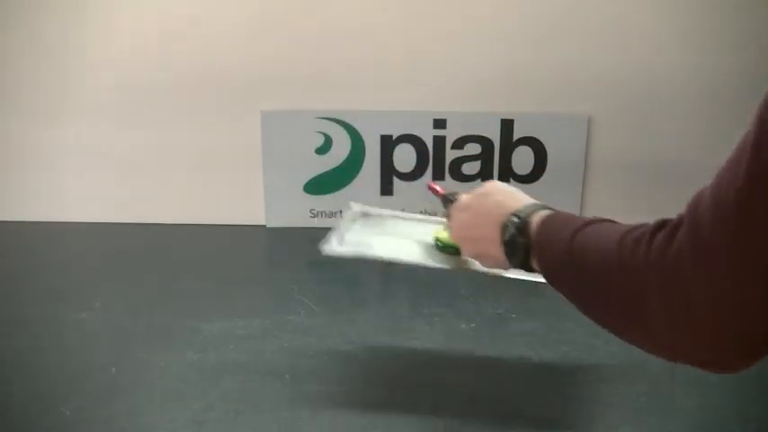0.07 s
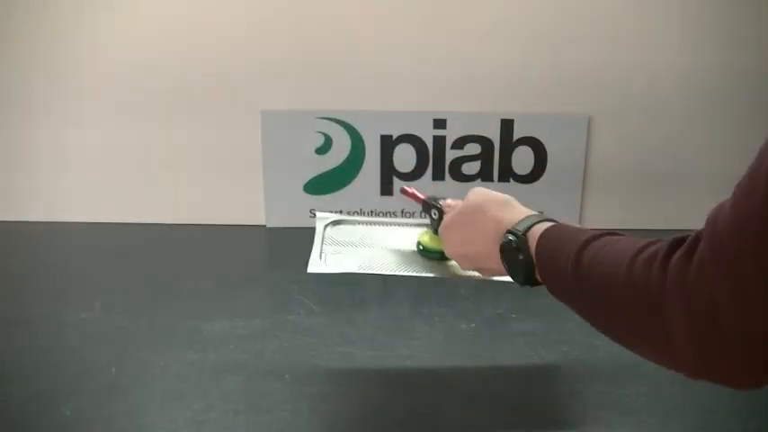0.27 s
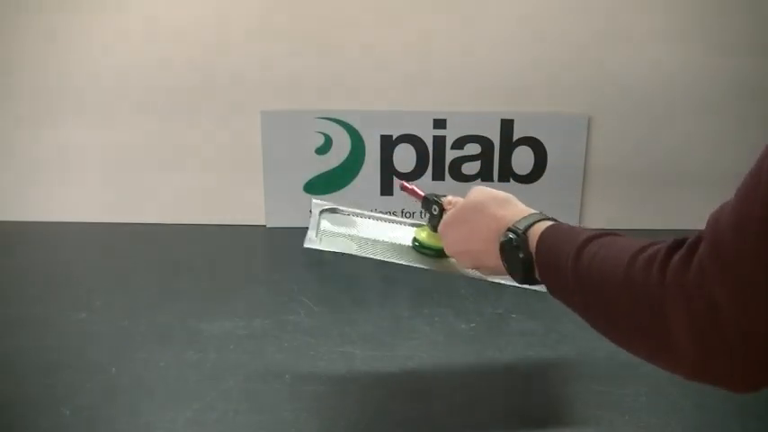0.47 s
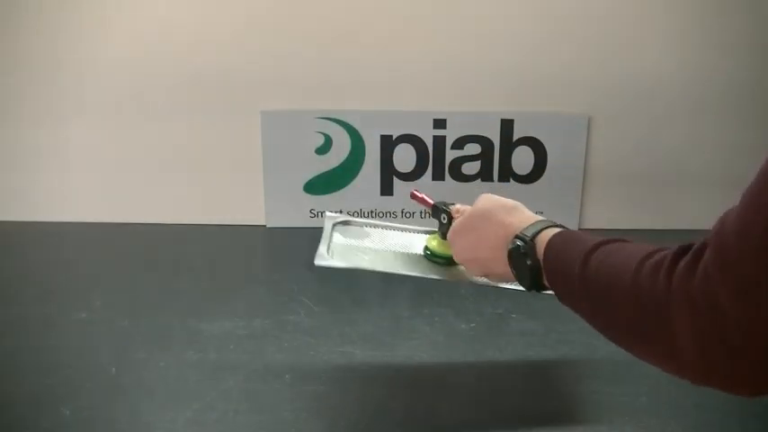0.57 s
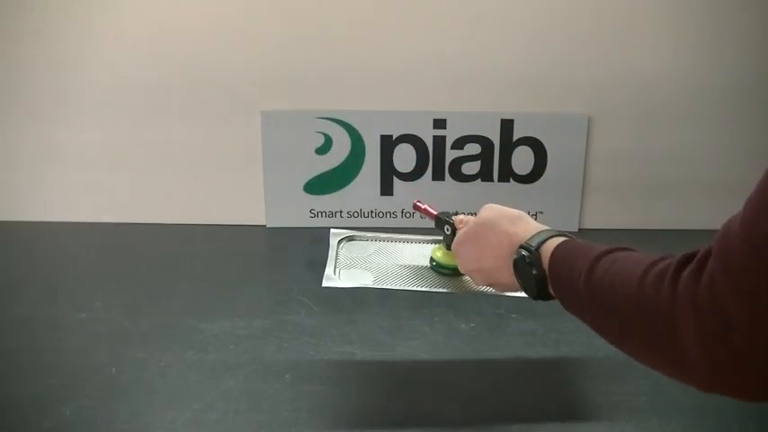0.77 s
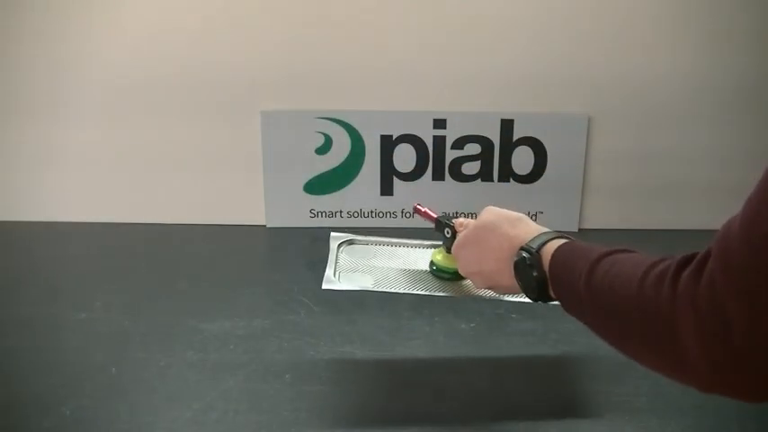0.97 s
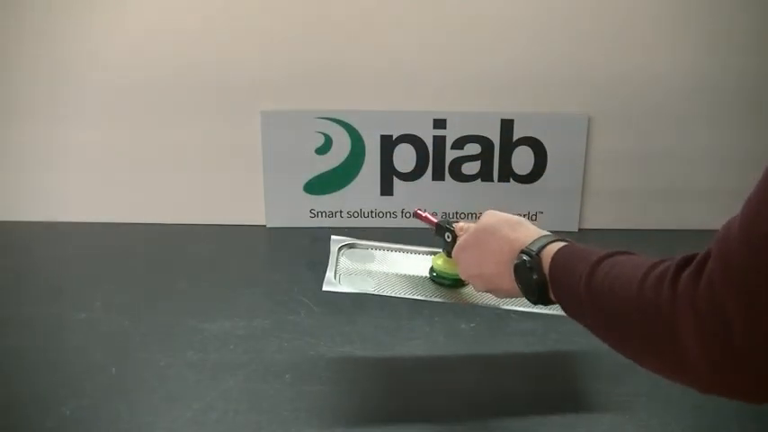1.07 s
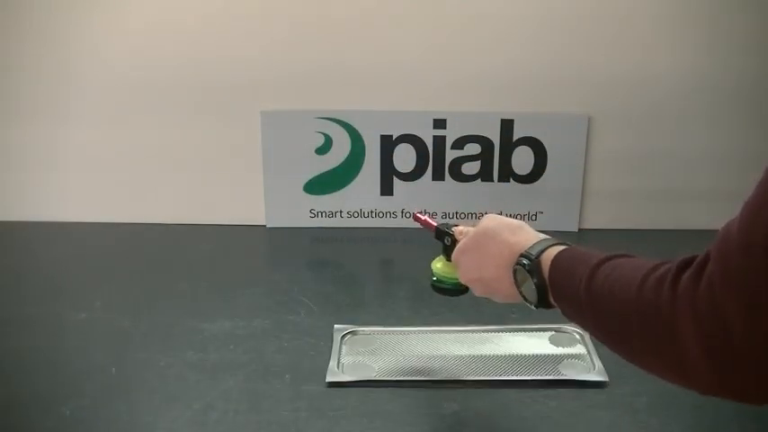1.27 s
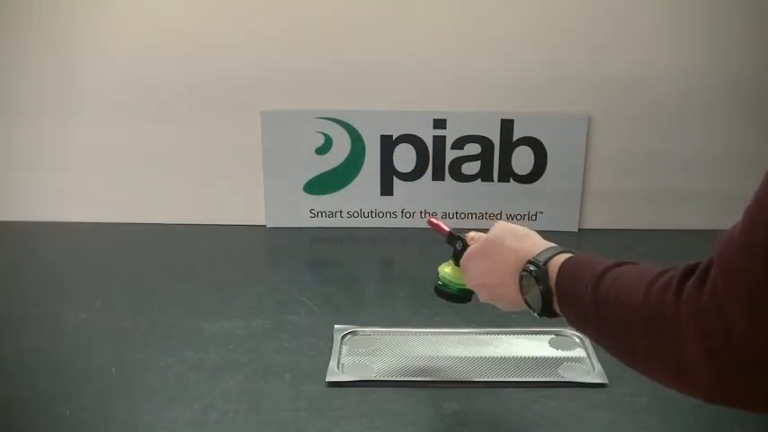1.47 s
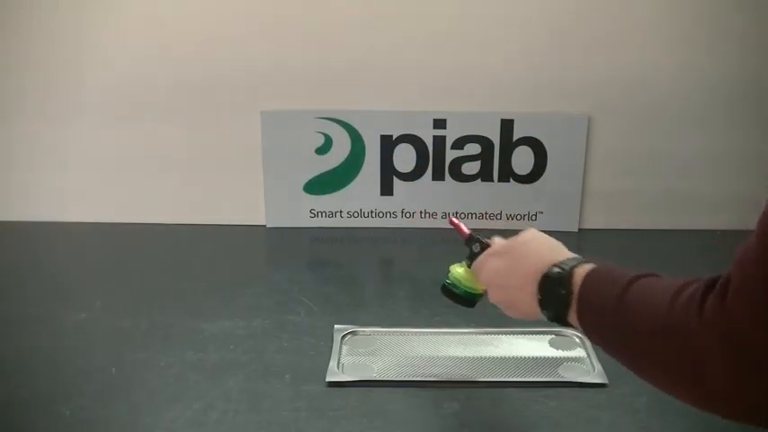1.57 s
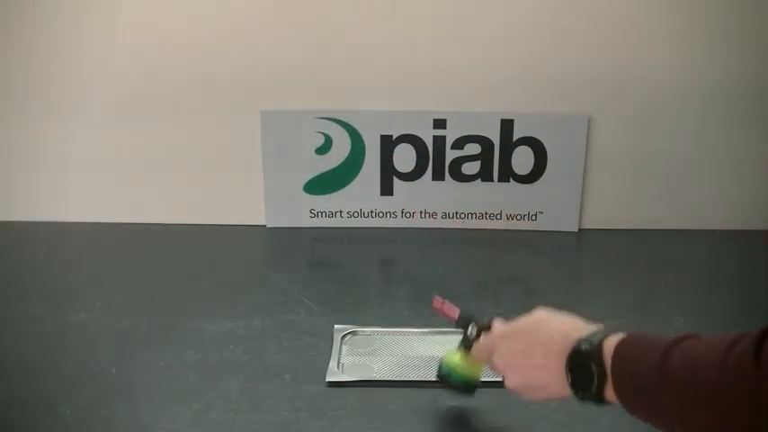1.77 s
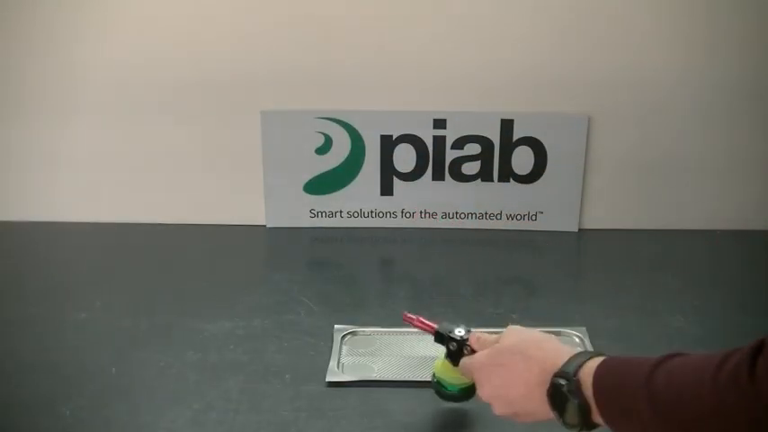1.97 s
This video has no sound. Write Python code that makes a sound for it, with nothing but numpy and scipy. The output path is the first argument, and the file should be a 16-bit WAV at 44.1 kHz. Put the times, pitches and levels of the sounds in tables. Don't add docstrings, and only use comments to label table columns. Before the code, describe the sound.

A thin metal sheet drops flat on a hard table with a loud, bright, clattering crash. Before it, a whistling compressed-air hiss snaps off with a valve click, then near quiet. Close stereo pickup in a lively room.

```python
import sys
import numpy as np
from scipy import signal
from scipy.fft import rfft, irfft, next_fast_len
from scipy.io import wavfile
from scipy.ndimage import uniform_filter1d, map_coordinates

SR = 44100
rng = np.random.default_rng(int(sys.argv[2]) if len(sys.argv) > 2 else 0)


def wrap_up_sound(samples):
    columns = np.atleast_2d(samples).T
    tamed = np.clip(columns, -1, 1)
    steps = np.round(tamed * 32767).astype(np.int16)
    wavfile.write(sys.argv[1], SR, steps)


def elevation(decibels):
    levels = np.asarray(decibels, float)
    return 10 ** (levels / 20)


N = 89567
LEAD = SR // 2
LEFT_DB = 1.2

# (time [s], level [dB])
CONTACTS = [
    (1.2609, 18),
    (1.263, 16),
    (1.266, 18),
    (1.2769, 4),
    (1.283, 5),
    (1.2873, 18),
    (1.2928, 16),
    (1.311, 10),
    (1.3649, 5),
]


def unit(x):
    return x / np.sqrt(np.mean(x ** 2) + 1e-20)


def along(points, hz):
    f, v = np.transpose(points)
    return np.interp(np.log(hz + 1), np.log(f + 1), v)


def filtered(x, response):
    n = x.shape[-1]
    m = next_fast_len(n + SR // 4)
    return irfft(rfft(x, m) * response(np.fft.rfftfreq(m, 1 / SR)), m)[..., :n]


def resonances(table):
    def response(f):
        total = 0
        for k, (centre_hz, width_hz, db) in enumerate(table):
            damping = 1j * f * width_hz
            total = total + (-1) ** k * elevation(db) * damping / (centre_hz * centre_hz - f * f + damping)
        return total
    return response


def noise(spectrum):
    return unit(filtered(rng.standard_normal(LEAD + N), lambda hz: elevation(along(spectrum, hz))))


def pair(x, alike):
    def mid_side(hz):
        turn = np.arccos(np.clip(along(alike, hz), -1, 1)) / 2
        return np.array([np.cos(turn), np.sin(turn)])
    mid, side = filtered(x, mid_side)
    return np.array([mid + side, mid - side])


def dying(t60s, channels):
    hz, t, z = signal.stft(rng.standard_normal((channels, SR)), SR, nperseg=256)
    t60 = np.maximum(along(t60s, hz), .01)[:, None]
    return signal.istft(z * elevation(-60 * t / t60), SR, nperseg=256)[1]


def clock():
    return (np.arange(LEAD + N) - LEAD) / SR


def puff(start_s, rise_s, hold_s, t60_s):
    t = clock() - start_s
    return np.clip(t / rise_s, 0, 1) * elevation(-60 * np.maximum(t - rise_s - hold_s, 0) / t60_s)


def ring(modes, t, longest_s):
    out = 0
    for hz, db, t60_s in modes:
        level_db = db + rng.normal(0, 2.2) - 60 * t / min(t60_s, longest_s)
        out = out + elevation(level_db) * np.sin(2 * np.pi * hz * t)
    return out


def shimmer(groups, t):
    out = 0
    for hz, width_hz, db, t60_s in groups:
        band = resonances([(hz, width_hz, 0)])
        beating = unit(filtered(rng.standard_normal(len(t)), lambda f: band(f) ** 2))
        out = out + elevation(db - 60 * t / t60_s) * beating
    return out


def patchy(x, db):
    z = signal.stft(x, nperseg=512)[2]
    field = uniform_filter1d(rng.standard_normal(z.shape), size=7, axis=0)
    field = uniform_filter1d(field, size=16, axis=1)
    return unit(signal.istft(z * elevation(db * unit(field)), nperseg=512)[1][:len(x)])


def add(out, s, x):
    part = out[LEAD + round(s * SR):][:len(x)]
    part += x[:len(part)]


def room_tone():
    # (frequency [Hz], density [dB per Hz])
    air_spectrum = [(15, -29), (30, 3), (55, 1), (100, -4.5), (250, -4.5), (1190, -16), (3080, -17.5),
                    (16000, -30.5)]
    # (frequency [Hz], correlation)
    air_alike = [(40, 0.95), (100, 0.54), (380, 0.21), (2380, 0.27), (15000, 0.13)]
    return elevation(-54.5) * pair(np.array([noise(air_spectrum), noise(air_spectrum)]), air_alike)


def jet():
    # (time [s], whistle level [dB], hiss level [dB])
    flow = [(0.0, -24, -17), (0.044, -19.5, -17.5), (0.124, -19.5, -19.5), (0.3, -19.5, -18.5),
            (0.4, -19.5, -19.5), (0.463, -20, -17.5), (0.47, -15.5, -23), (0.475, -25, -24),
            (0.49, -23, -22), (0.497, -15.5, -20), (0.503, -22, -21)]
    # (frequency [Hz], width [Hz], level [dB])
    nozzle = [(2970, 500, -24.5), (5620, 540, -14.5), (5955, 250, -6.5), (6260, 283, -3.5),
              (6760, 634, -12), (10790, 450, -21.5), (11600, 600, -19.5)]
    # (frequency [Hz], density [dB per Hz])
    hiss_spectrum = [(200, -23), (1100, -15.5), (1800, -2), (4500, 1), (8000, 3), (9700, -0.5), (13400, -3),
                     (15500, -0.5)]
    # (time [s], pitch ratio)
    pitch = [(0, .978), (.13, 1.001), (.28, .997), (.42, 1.006), (.5, .985)]
    flutter_db, flutter_hz = 1, 244
    shut_s, shut_fall_s = .503, 0.0035
    t = clock()

    flutter_at = np.arange(LEAD + N) * flutter_hz / SR
    flutter = map_coordinates(rng.standard_normal(2000), [flutter_at], mode="mirror")
    turbulence = elevation(flutter_db * flutter) * rng.standard_normal(LEAD + N)
    whistle = unit(filtered(turbulence, resonances(nozzle)))
    read_at = np.cumsum(np.interp(t, *np.transpose(pitch)))
    whistle = unit(map_coordinates(whistle, [read_at], mode="mirror"))

    s, whistle_db, hiss_db = np.transpose(flow)
    whistle = elevation(np.interp(t, s, whistle_db)) * whistle
    hiss = elevation(-7 + np.interp(t, s, hiss_db)) * patchy(noise(hiss_spectrum), db=3)
    return (whistle + hiss) * np.clip((shut_s - t) / shut_fall_s + 1, 0, 1)


def ports(x, lean, lead):
    def half(hz):
        return elevation(along(lean, hz) / 2 - LEFT_DB) * np.exp(.5j * along(lead, hz))
    return filtered(x[None], lambda hz: np.array([half(hz), 1 / half(hz)]))


def unrelated(x):
    # (frequency [Hz], level [dB])
    spread = [(1000, -30), (4000, -21.5), (7000, -10.5), (10000, -6.5), (15000, -11)]
    return filtered(x, lambda hz: elevation(along(spread, hz))) * [[1], [-1]]


def room(x):
    # (frequency [Hz], t60 [s])
    room_t60 = [(150, 0.84), (500, 0.9), (1500, 1.07), (3000, 0.86), (6000, 0.53), (12000, 0.32)]
    # (frequency [Hz], correlation)
    room_alike = [(60, 0.59), (240, 0.9), (950, 0.93), (3770, 0.63), (15000, 0.043)]
    gap_s = .006
    tail = pair(dying(room_t60, channels=2), room_alike)
    late = np.pad(x, (round(gap_s * SR), 0))[None]
    return signal.fftconvolve(late, tail / np.linalg.norm(tail[0]), axes=1)[:, :LEAD + N]


def valve():
    # (time [s], level [dB])
    snaps = [
        (.5108, -8.5),
        (0.5125, -9.5),
        (0.515, -8.5),
        (0.517, -12),
    ]
    # (frequency [Hz], level [dB], t60 [s])
    valve_modes = [(303, -2, .03), (710, -13, .03), (2070, -11, .03), (3090, -13.5, 0.096),
                   (4643, -5.5, 0.036), (4930, -9, .03), (5630, -9, .02), (6100, -9, 0.04),
                   (7000, -1, 0.0088), (7500, -2, 0.023), (9560, -5.5, 0.072), (9930, -14.5, 0.25),
                   (12680, -13, .03)]
    # (frequency [Hz], width [Hz], level [dB], t60 [s])
    held = [(3040, 140, -39.5, 1), (4560, 130, -43, .95), (6230, 120, -37, .7)]
    # (frequency [Hz], width [Hz], level [dB])
    housing = [(1520, 2400, -11), (5300, 2050, 3), (6900, 2700, -0.5), (12500, 4200, 1)]
    # (frequency [Hz], density [dB per Hz])
    vent_spectrum = [(180, -48), (300, -27.5), (624, -33), (725, -20), (1210, -22.5), (1480, -18),
                     (7080, -6.5), (16000, -22.5)]

    out, t = np.zeros(LEAD + N), np.arange(SR // 20) / SR
    for s, db in snaps:
        tone = 0.97 * ring(valve_modes, t, longest_s=.016)
        click = 0.78 * elevation(-60 * t / 0.02) * rng.standard_normal(len(t))
        add(out, s, elevation(db) * (tone + click))
    add(out, snaps[0][0], shimmer(held, np.arange(SR // 2) / SR))
    vent = elevation(-22.5) * noise(vent_spectrum) * puff(start_s=0.4974, rise_s=0.03, hold_s=0.041, t60_s=0.32)
    return filtered(out, resonances(housing)) + vent


def cup():
    # (time [s], peak level [dB])
    ticks = [
        (1.0854, -52),
        (1.125, -42.5),
        (1.1475, -40.5),
    ]
    # (frequency [Hz], width [Hz], level [dB])
    lip = [(1100, 580, 6), (2470, 1500, 5.5), (5500, 5000, 0)]
    # (frequency [Hz], density [dB per Hz])
    leak_spectrum = [(590, -40), (1000, -4), (2590, -15), (3230, -1), (3500, -5), (5020, 1), (16000, -14)]

    blows, t = np.zeros(LEAD + N), np.arange(SR // 50) / SR
    for s, db in ticks:
        add(blows, s, elevation(db - 60 * t / 0.019) * rng.standard_normal(len(t)))
    leak = elevation(-57.5) * noise(leak_spectrum) * puff(start_s=1.078, rise_s=0.089, hold_s=0.028, t60_s=0.3)
    return filtered(blows, resonances(lip)) + leak


def sheet():
    # (frequency [Hz], level [dB], t60 [s])
    bright = [(1885, -16, 1.1), (2820, -26, 5.0), (3370, -32, 5.0), (3900, -10, 3.9), (4200, -15, 1.0),
              (4100, -7.5, 0.57), (4140, -6, 0.85), (4570, -22.5, 5.0), (4680, -9, 0.53), (4820, -7, 0.73),
              (5600, -8, 0.91), (6050, -13, 0.87)]
    # (frequency [Hz], density [dB per Hz])
    crash_spectrum = [(100, -29), (300, -18.5), (700, -13), (1100, -4.5), (2000, -1), (4300, -2), (7500, 3),
                      (16000, -8)]
    # (frequency [Hz], t60 [s])
    crash_t60 = [(200, 0.86), (1000, 0.33), (4000, 0.61), (8000, 0.4), (15000, 0.26)]
    # (frequency [Hz], width [Hz], level [dB])
    clusters = [(1968, 250, 1), (2880, 130, 4.5), (4000, 410, 4.5), (5510, 690, 3.5), (7050, 190, -2)]
    # (frequency [Hz], width [Hz], level [dB], t60 [s])
    linger = [(1879, 130, -27.5, 1.21), (2920, 740, -24, 1.03), (4130, 300, -13, 0.52)]
    # (frequency [Hz], width [Hz], level [dB])
    table_top = [(397, 240, -1.5), (684, 300, 4), (1287, 700, 4.5), (2280, 1600, -7)]
    # (frequency [Hz], width [Hz], level [dB])
    crack = [(820, 2400, -5.5), (4890, 1900, 5.5), (10000, 2800, -6), (14500, 3000, -10)]
    ring_db, crash_db, thud_db = -11.5, 0.5, 11.5
    crack_t60_s, thud_t60_s, scatter = 0.0019, 0.098, 0.59
    swell, swell_s = 0.23, 0.037

    out, cracks, t = np.zeros(LEAD + N), np.zeros(LEAD + N), np.arange(SR * 4 // 5) / SR
    slap_s = CONTACTS[0][0]

    def dense(hz):
        return elevation(along(crash_spectrum, hz)) * (1 + np.abs(resonances(clusters)(hz)))

    crash = filtered(dying(crash_t60, channels=1)[0], dense)[:len(t)]
    crash = crash / np.std(crash[:SR // 50]) * (1 - swell * np.exp(-t / swell_s))
    clear = elevation(ring_db) * ring(bright, t, longest_s=0.4)
    add(out, slap_s, elevation(crash_db) * crash + clear + shimmer(linger, t))

    thud = elevation(thud_db - 60 * t / thud_t60_s) * rng.standard_normal(len(t))
    add(cracks, slap_s, filtered(thud, resonances(table_top)))
    for s, db in CONTACTS:
        blow = np.r_[1, scatter * rng.standard_normal(SR // 100 - 1)]
        add(cracks, s, elevation(db - 60 * t[:SR // 100] / crack_t60_s) * blow)
    return out + filtered(cracks, resonances(crack))


def flexing():
    # (frequency [Hz], level [dB], t60 [s], rise [s])
    flex = [(146.5, -16.5, 0.58, 0.21), (208, -23.5, 0.55, 0.14), (243, -27.5, 0.37, 0.033),
            (352, -29, 0.72, 0.057), (374.4, -14.5, 0.21, 0.0041), (424, -30, 0.52, 0.013),
            (611, -25.5, 0.3, 0.0015), (787, -29, .3, .002), (1009, -26, 0.63, 0.0045)]
    out, t = np.zeros(LEAD + N), np.arange(SR * 4 // 5) / SR
    for hz, db, t60_s, rise_s in flex:
        envelope = elevation(db - 60 * t / t60_s) * (1 - np.exp(-t / rise_s)) ** 2
        add(out, CONTACTS[0][0], envelope * np.sin(2 * np.pi * hz * t))
    return out


def scene():
    # (frequency [Hz], level [dB])
    jet_lean = [(60, 2.5), (180, -1), (550, -1.5), (1650, -1), (4970, 2), (15000, 3)]
    sheet_lean = [(60, 0.5), (240, 0.99), (950, 0.87), (3770, 1.5), (15000, 1.5)]
    # (frequency [Hz], phase [rad])
    jet_lead = [(0, 0), (6800, -0.19), (8180, 0.1), (11200, 0.43), (15600, -0.057), (16500, 1.1)]
    sheet_lead = [(0, 0.16), (5600, 0.093), (8610, -0.6), (11200, 0.1), (16500, -0.086)]

    gripper, plate = jet() + valve() + cup(), sheet()
    near = ports(gripper, jet_lean, jet_lead) + ports(plate + flexing(), sheet_lean, sheet_lead)
    echoes = room(elevation(-7.5) * gripper + elevation(-11) * plate)
    diffuse = room_tone() + unrelated(jet() + valve() + sheet())
    return (elevation([[LEFT_DB], [-LEFT_DB]]) * (near + echoes + diffuse))[:, LEAD:]


def narrowed(x):
    # (frequency [Hz], level [dB])
    side_limit = [(300, -30.5), (2000, -27), (4500, -25), (7000, -39.5), (12000, -30.5), (16000, -28)]
    faint_hz, faint_db, fickle_db = 14000, -100, 2.5

    def band_rms(z):
        return np.sqrt(np.mean(np.abs(z.reshape(64, 16, -1)) ** 2, axis=1))

    mid_side = np.array([x[0] + x[1], x[0] - x[1]]) / 2
    mid, side = signal.stft(mid_side, nperseg=2048)[2][:, :1024]
    mid_rms, side_rms = band_rms(mid), band_rms(side)
    hz = (np.arange(64)[:, None] + .5) * SR / 128
    waver = elevation(fickle_db * rng.standard_normal((2, *mid_rms.shape)))
    keep_side = side_rms * waver[0] > elevation(along(side_limit, hz)) * mid_rms.max(axis=0)
    keep_mid = (mid_rms * waver[1] > elevation(faint_db + (hz - faint_hz) / 150)) | (hz < faint_hz)
    kept = np.array([mid, side]) * np.repeat([keep_mid, keep_side & keep_mid], 16, axis=1)
    mid, side = signal.istft(np.pad(kept, ((0, 0), (0, 1), (0, 0))), nperseg=2048)[1][:, :N]
    return np.array([mid + side, mid - side])


def low_pass(x):
    return signal.sosfilt(signal.butter(12, 16990, fs=SR, output="sos"), x)


def record(dry):
    duck_s, duck_db, grab_s, let_go_s = 1.2614, -16, 0.00098, 0.17
    top_hz, top_db, low_hz = 15700, -35, 44.7

    def band_limits(hz):
        return np.where(hz < top_hz, 1, elevation(top_db)) * hz ** 2 / (hz ** 2 + low_hz ** 2)

    t = np.arange(N) / SR - duck_s
    duck = np.clip(np.minimum(t / grab_s + 1, 1 - t / let_go_s), 0, 1)
    x = dry * elevation(duck_db * duck)
    x = x / (1 + np.abs(x) ** 6) ** (1 / 6)
    mix = narrowed(filtered(x, band_limits))
    return low_pass(mix)


dry = scene()
out = record(dry)
wrap_up_sound(out)
```